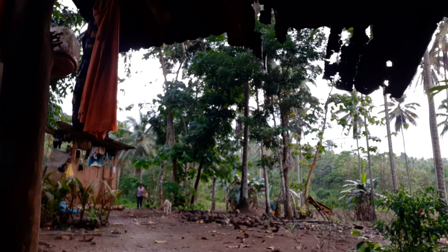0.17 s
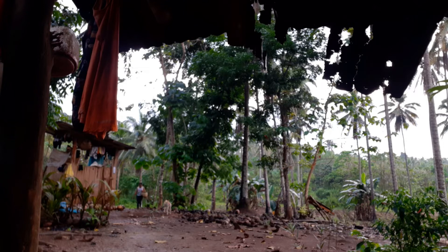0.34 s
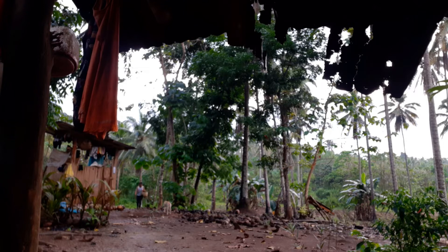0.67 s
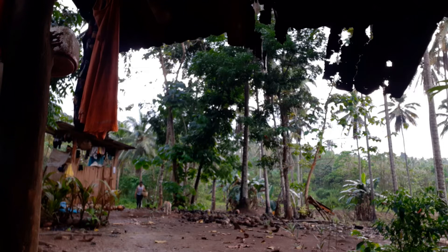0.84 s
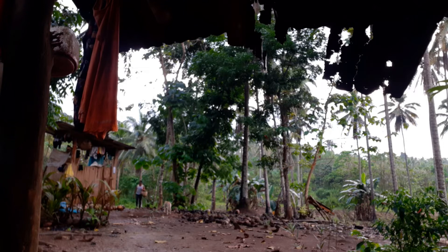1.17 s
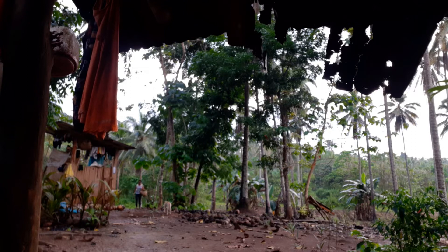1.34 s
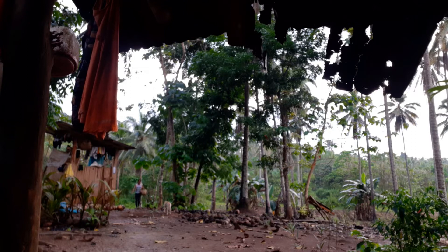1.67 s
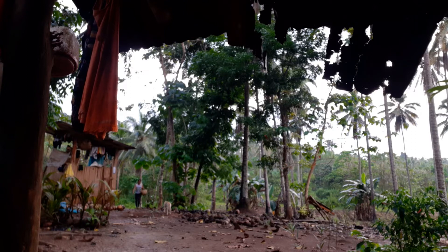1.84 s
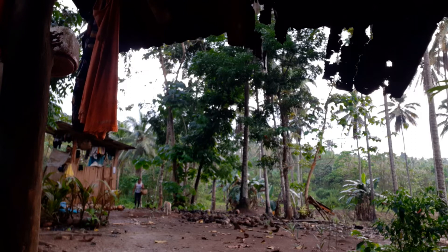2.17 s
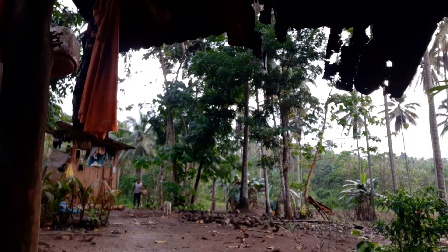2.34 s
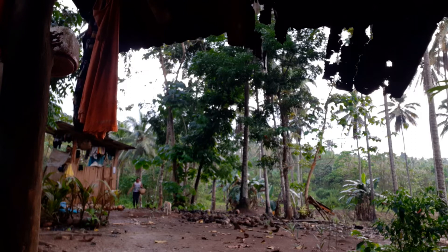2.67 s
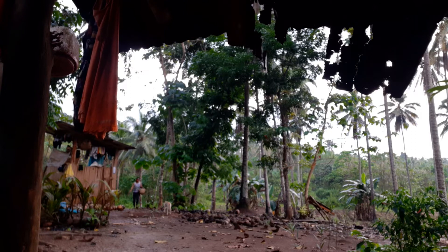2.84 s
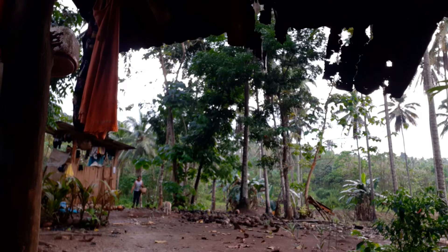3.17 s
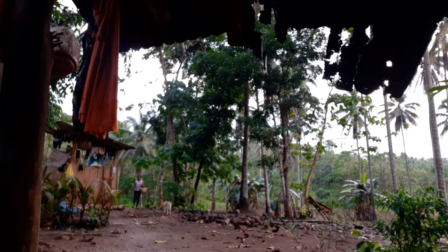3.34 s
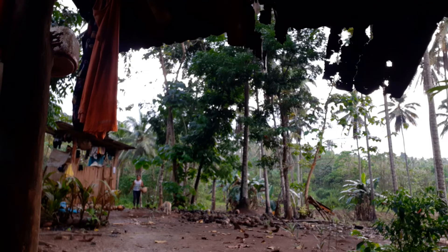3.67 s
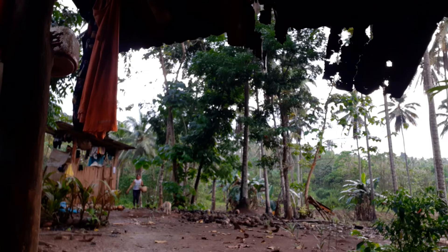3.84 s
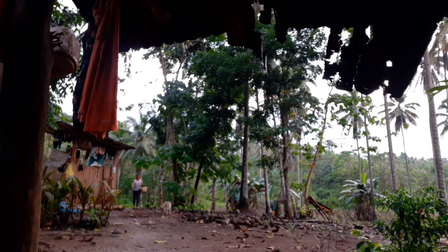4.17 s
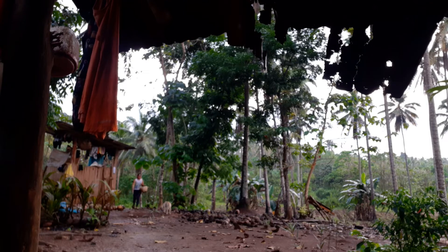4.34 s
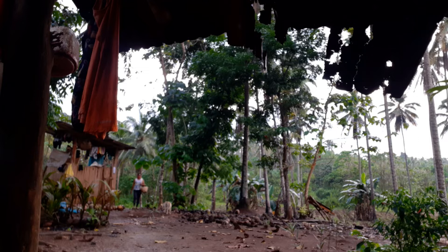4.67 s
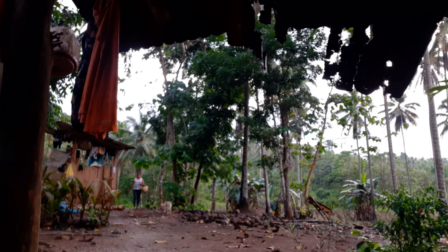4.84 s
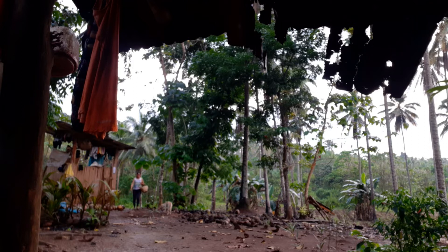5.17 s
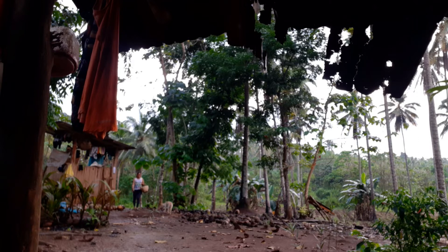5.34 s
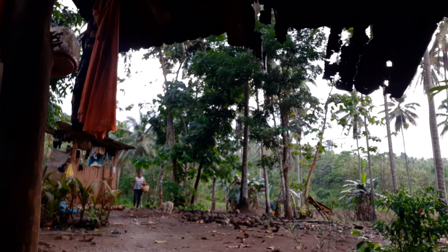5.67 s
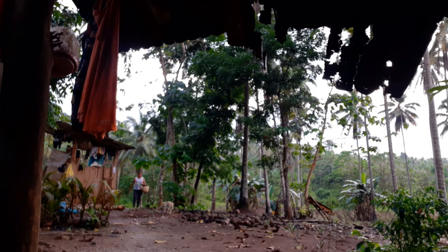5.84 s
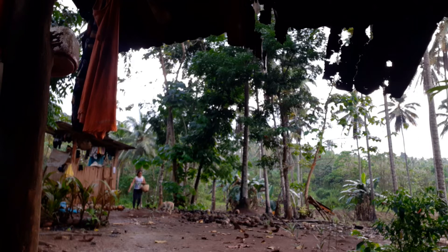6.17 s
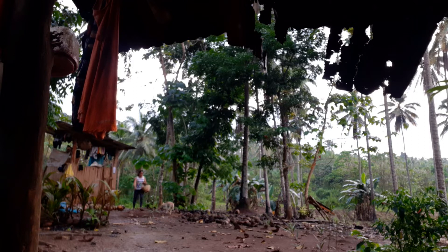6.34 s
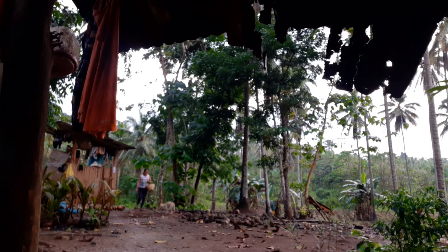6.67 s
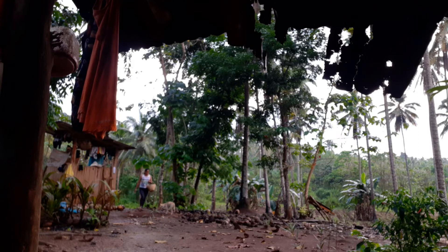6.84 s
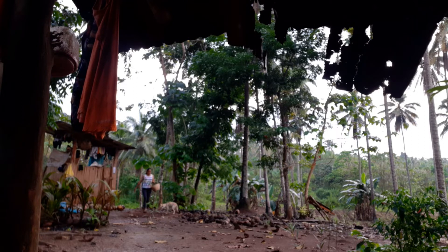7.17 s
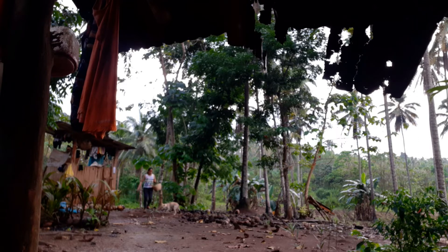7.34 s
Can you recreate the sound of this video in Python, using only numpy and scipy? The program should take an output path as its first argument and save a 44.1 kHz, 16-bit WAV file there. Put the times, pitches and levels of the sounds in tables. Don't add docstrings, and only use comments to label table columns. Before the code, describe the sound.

Outdoor yard with steady close hen clucks ending in a strained squawk, high songbirds, faint insect hiss, soft footsteps on leaves and low rumble.

```python
import sys
import numpy as np
from scipy import signal
from scipy.fft import rfft, irfft, next_fast_len
from scipy.io import wavfile

SR = 44100
rng = np.random.default_rng(int(sys.argv[2]) if len(sys.argv) > 2 else 0)


def undo_db(level):
    steps = np.asarray(level, float) / 20
    return 10 ** steps


def master(y):
    cut = np.clip(np.atleast_2d(y).T, -1, 1)
    pcm = np.round(cut * 32767)
    wavfile.write(sys.argv[1], SR, pcm.astype(np.int16))


N = 330750
SIZE = next_fast_len(N + SR)
HZ = np.arange(SIZE // 2 + 1) * SR / SIZE
T = np.arange(N) / SR


def at_hz(points, hz):
    table_hz, value = np.array(points).T
    return np.interp(np.log(hz + 1), np.log(table_hz), value)


def rms_one(x):
    return x / np.sqrt(np.mean(x ** 2) + 1e-20)


def wobble(shape, hz):
    *rows, length = np.atleast_1d(shape)
    settle = 1500
    white = rng.standard_normal((*rows, (length // 12000 + 1) * 12000 + settle))
    lowpass = signal.butter(2, hz, fs=SR, output="sos")
    return rms_one(signal.sosfilt(lowpass, white[..., :length + settle])[..., settle:])


def add(out, s, x):
    i = round(s * SR)
    a, b = max(i, 0), min(i + len(x), N)
    out[a:b] += x[a - i:b - i]


# f/Hz, likeness/1
MIC_LIKENESS = [(60, 0.93), (130, 0.97), (290, 0.87), (640, 0.56), (1400, -0.22), (3080, -0.084),
                (6760, -0.035), (14800, 0.025)]


def coloured(spectrum):
    mid, side = rfft(rng.standard_normal((2, SIZE))) * undo_db(at_hz(spectrum, HZ))
    alike = np.clip(at_hz(MIC_LIKENESS, HZ), -1, 1)
    mid = mid * np.sqrt(1 + alike)
    side = side * np.sqrt(1 - alike)
    return rms_one(irfft([mid + side, mid - side], SIZE)[:, :N])


# f/Hz, t60/s
TREES_T60 = [(200, 0.1), (600, 0.21), (1000, 0.54), (2000, 0.57), (5000, 0.94), (12000, 0.067)]


def placed(x, pan_db, lag_s, wet_db, echo_db, reach):
    t, tail = np.arange(SR) / SR, 0
    white = rng.standard_normal((2, SR))
    for hz, t60 in TREES_T60:
        band = signal.butter(1, [hz / 3.05, hz * 1.82], "band", fs=SR, output="sos")
        tail = tail + signal.sosfilt(band, white) * undo_db(-60 * t / max(t60 * reach, .05))
    tail = tail * np.clip(t / 0.004, 0, 1) / np.sqrt(np.sum(tail ** 2) / 2)
    direct = np.exp(-2j * np.pi * HZ * [[0], [lag_s]])
    echo = undo_db(echo_db) * np.exp(-2j * np.pi * HZ * [[.046], [.0465]])
    pan = undo_db(pan_db / 2 * np.array([[1], [-1]]))
    path = pan * (direct + echo + undo_db(wet_db) * rfft(tail, SIZE))
    return irfft(rfft(x, SIZE) * path, SIZE)[:, :N]


# f/Hz, level/dB per Hz
RUMBLE = [(12, -47), (20, -29.5), (65, 1.5), (97, 2.5), (372, -13.5), (530, -13), (1150, -16.5),
          (1390, -22.5), (1530, -12), (1850, -20), (2080, -13.5), (2400, -19), (3110, -14.5), (4220, -22.5),
          (5600, -23.5), (7280, -16), (12300, -120)]


def rumble():
    return undo_db(-52.5 + 2.44 * wobble(N, 2.8)) * coloured(RUMBLE)


# t/s, peak level/dB, spread/s
FAR_SWELLS = [
    (.67, -58, 0.22),
    (3.88, -48.5, 0.15),
    (6.27, -58.5, 0.22),
]


def far_yard():
    level = undo_db(-56 - 0.64 * T)
    for s, db, spread in FAR_SWELLS:
        level = level + undo_db(db) * np.exp(-((T - s) / spread) ** 2)
    colour = [(100, -73), (180, -2), (300, -9), (500, -12.5), (1200, -14.5), (3000, -47)]
    return level * undo_db(-5.5 + 3.8 * wobble(N, 9.1)) * coloured(colour)


# f/Hz, level/dB per Hz
INSECTS = [(2940, -22), (5000, -15), (6060, -32), (6590, -5.5), (7410, 0), (7650, -0.5), (8410, -22),
           (9490, -15.5), (10100, -4.5), (10300, -4), (10800, -8.5), (10900, -10.5), (12000, -29.5),
           (14000, -21), (15300, -22.5)]


def insects():
    return undo_db(-55 + 0.51 * wobble(N, 60)) * coloured(INSECTS)


# t/s, peak level/dB, t60/s
STEPS = [
    (0.2234, -48, 0.11),
    (0.746, -51, 0.68),
    (2.1905, -49.5, 0.19),
    (2.664, -46.5, 0.28),
    (3.704, -41.5, 0.34),
]
# f/Hz, level/dB per Hz
STEP_COLOUR = [(35, -40), (60, -8), (347, -5.5), (551, -16), (916, 3.5), (1450, -6), (1600, -5.5),
               (7500, -22.5), (8820, -37), (9900, -23), (15000, -34)]
# t/s, peak level/dB
RUSTLES = [(.049, -52), (.258, -48), (.379, -53), (1.317, -64), (2.678, -65), (3.159, -53.5), (3.722, -60),
           (3.866, -49), (3.966, -49), (4.179, -55), (5.402, -47), (7.129, -63)]


def footfalls():
    crunch, rustle = np.zeros(N), np.zeros(N)
    t = np.arange(SR // 2) / SR
    for s, db, t60 in STEPS:
        add(crunch, s, undo_db(db + 7.5 - 60 * t / max(t60, .05)) * np.clip(t / 0.0074, 0, 1))
    for s, db in RUSTLES:
        add(rustle, s - .01, undo_db(db - 7.5) * np.hanning(round(.08 * SR)))
    leaves = coloured([(2000, -30), (5000, 7), (9000, -1), (13000, 5), (15500, -3)])
    return crunch * coloured(STEP_COLOUR) + rustle * leaves


# start t/s, end t/s, f/Hz, level/dB
CRICKET = [
    (4.995, 5.89, 3090, -61),
    (1.22, 1.45, 2900, -65),
]


def cricket():
    out = np.zeros(N)
    chirps_per_s = 8.75
    for start, end, hz, db in CRICKET:
        t = np.arange(start, end, 1 / SR)
        swing = np.sin(2 * np.pi * chirps_per_s * (t - start) + 0.48 * wobble(len(t), 3))
        throb = np.clip(swing, 0, 1) * (1 + .5 * wobble(len(t), 79))
        add(out, start, undo_db(db + 0.5) * throb * np.sin(2 * np.pi * hz * t))
    return out


def whistle(hz, db, fuller_db):
    tone = np.sin(2 * np.pi * np.cumsum(hz * (1 + 0.0098 * wobble(len(hz), 59))) / SR)
    level_db = db + 2.5 * wobble(len(hz), 29) + fuller_db * np.log2(hz.max() / hz)
    return np.sqrt(2) * undo_db(level_db) * signal.windows.tukey(len(hz), .2) * tone


# start t/s, hold/s, dive/s, bottom f/Hz, level/dB
HIGH_SONG = [(.29, .11, .06, 3300, -61), (.81, .13, .11, 2750, -58), (1.8, .115, .08, 3400, -63),
             (2.29, .14, .05, 3700, -61), (2.82, .125, .09, 2900, -59), (3.61, .06, .02, 4400, -60),
             (6.425, .13, .065, 2900, -60), (6.79, .125, .055, 2750, -60), (7.345, .14, .06, 3500, -62)]


def high_songbird():
    out = np.zeros(N)
    top_hz, bend_hz = 4566, 231
    for s, hold, dive, low_hz, db in HIGH_SONG:
        t = np.arange(0, hold + dive, 1 / SR)
        held = top_hz - bend_hz * (np.minimum(t / hold, 1) * 1.4 - .3) ** 2
        dived = 1 - np.exp(-3.0 * np.clip((t - hold) / dive, 0, 1) ** 1.3)
        hz = held + (low_hz - held) * dived
        thin_db = 7 * np.exp(-((hz - 3900) / 450) ** 2)
        add(out, s, whistle(hz, db - 0.5 - thin_db, fuller_db=4.0))
    return out


# start t/s, length/s, top f/Hz, bottom f/Hz, level/dB
HOOKS = [(4.35, 0.076, 3870, 3550, -57), (4.466, 0.065, 3990, 2750, -54.5), (5.318, 0.076, 3880, 3065, -56),
         (5.42, 0.067, 3940, 3490, -54), (5.532, 0.067, 4093, 3170, -51), (5.664, 0.054, 4070, 3090, -49.5),
         (6.687, 0.062, 3830, 3200, -60)]


def hooked_notes():
    out = np.zeros(N)
    for s, length, top_hz, low_hz, db in HOOKS:
        u = np.linspace(0, 1, round(length * SR))
        hz = np.interp(u, [0, .2, .55, .72], [top_hz - 400, top_hz, .99 * top_hz, low_hz])
        add(out, s, whistle(hz, db, fuller_db=-3.0))
    return out


# start t/s, length/s, from f/Hz, to f/Hz, level/dB
SLIDES = [(0.089, 0.091, 3360, 3290, -53.5), (0.664, 0.0394, 3210, 2890, -48),
          (0.702, 0.028, 2910, 3350, -51.5), (0.887, 0.04, 3430, 3390, -58),
          (1.131, 0.046, 3254, 3330, -51.5), (3.845, .05, 3660, 3420, -64), (4.001, 0.036, 3200, 3410, -61),
          (4.543, .03, 4090, 3670, -52), (4.577, .04, 3670, 3570, -52), (6.45, 0.055, 3590, 3200, -64),
          (6.61, 0.0265, 3030, 3750, -63), (6.965, 0.047, 3380, 3270, -63), (7.099, .05, 3680, 3080, -66),
          (7.278, 0.068, 3850, 3200, -63), (7.418, 0.036, 3700, 3380, -67)]


def slides():
    out = np.zeros(N)
    for s, length, from_hz, to_hz, db in SLIDES:
        add(out, s, whistle(np.linspace(from_hz, to_hz, round(length * SR)), db, fuller_db=4.0))
    return out


# start t/s, end t/s, top f/Hz, bottom f/Hz, level/dB
TRILLS = [
    (0.409, 0.916, 3750, 2566, -52.5),
    (3.195, 3.753, 3927, 2697, -48.5),
    (4.606, 4.956, 3900, 2732, -48.5),
]


def trills():
    out = np.zeros(N)
    notes_per_s, pause = 30.2, .62
    for start, end, top_hz, low_hz, db in TRILLS:
        t = np.arange(0, end - start, 1 / SR)
        u = (t * notes_per_s + .03 * wobble(len(t), 12.6)) % 1
        fallen = np.interp(u, [.25, .42, .58, .72], [0, pause, pause, 1])
        hz = top_hz + (low_hz - top_hz) * fallen + 50 * wobble(len(t), 64.4)
        phase = 2 * np.pi * np.cumsum(hz) / SR
        level = np.sin(np.pi * np.clip(u / .95, 0, 1)) ** 0.37 * undo_db(db + 1.7 * wobble(len(t), 60))
        tone = np.sin(phase) + undo_db(-8.5) * fallen * np.sin(2 * phase)
        add(out, start, level * signal.windows.tukey(len(t), .07) * tone)
    return out


def syrinx(pitch_hz, half, rough, throat_db, count, waver_db):
    n = len(pitch_hz)
    phase = np.pi * np.cumsum(pitch_hz * (1 + 0.033 * rough * wobble(n, 104))) / SR
    k = np.arange(1, count + 1)[:, None]
    hz = k * pitch_hz / 2
    gain = undo_db(throat_db(hz) + waver_db * wobble((count, n), 37.5))
    gain = gain * np.where(k % 2, half, 1) * (hz < 15300)
    breath = np.clip(rough * hz / 1000, 0, 1)
    flutter = np.sqrt(1 - breath ** 2) + breath * wobble((count, n), 210)
    start_phase = rng.uniform(0, 2 * np.pi, k.shape)
    tone = np.sum(gain * flutter * np.cos(k * phase + start_phase), axis=0)
    return tone / np.sqrt(np.sum(gain ** 2, axis=0) / 2 + 1e-20)


def clucks(rows, throat, half, rough):
    out = np.zeros(N)
    for s, db, hz, length in rows:
        loose = 1 + 0.04 * (-40 - db)
        u = np.linspace(-1, 1, round(1.67 * length * SR))
        pitch = hz * (1.01 - 0.0413 * u ** 2 + 0.0088 * u)
        voice = syrinx(pitch, half * loose * (1 - 0.49 * u), rough * loose * (1 - 0.72 * u),
                       lambda f: at_hz(throat, f), count=26, waver_db=4.0)
        add(out, s - .8 * length, undo_db(db + 1.5 * u) * np.cos(u * np.pi / 2) ** 1.82 * voice)
    return out


# middle t/s, level/dB, f/Hz, length/s
LOW_CLUCKS = [
    (5.125, -42, 581, 0.032),
    (5.333, -38.5, 408.5, 0.046),
    (5.655, -41.5, 364, .06),
]
# f/Hz, level/dB
LOW_THROAT = [(120, -34), (200, -4.5), (390, -5), (620, 7.5), (850, -3.5), (1180, -28), (1500, -13),
              (2100, -14.5), (2800, -24), (4000, -15), (6000, -45)]


def other_hen():
    return clucks(LOW_CLUCKS, LOW_THROAT, half=0.97, rough=0.77)


# middle t/s, level/dB, f/Hz, length/s
CLUCKS = [(.02, -35, 506.4, 0.042), (.232, -38, 486, 0.05), (.44, -38, 483.3, 0.036), (.66, -35, 481, 0.03),
          (.878, -36, 487, 0.05), (1.098, -38, 486.7, 0.044), (1.32, -37, 483, 0.034),
          (1.535, -36, 484.5, 0.044), (1.75, -37, 486.4, .043), (1.972, -37, 485, 0.041),
          (2.21, -44.5, 485.4, 0.066), (2.44, -36.5, 484.8, 0.048), (2.645, -37, 494, 0.041),
          (2.865, -35, 492, 0.048), (3.095, -36.5, 486.4, 0.047), (3.345, -38.5, 471, 0.04),
          (3.722, -41.5, 470, 0.052), (3.97, -39.5, 471.5, .039), (4.148, -45, 441, 0.024),
          (4.185, -38, 485, 0.038), (4.41, -39, 472.6, 0.032), (4.63, -41, 474, 0.045),
          (4.855, -40, 474, 0.038), (5.125, -36.5, 476.5, .043), (5.582, -44.5, 445.6, 0.038),
          (5.805, -40, 471, 0.046)]
# f/Hz, level/dB
CLUCK_THROAT = [(150, -29), (250, -16.5), (485, -8), (730, -11.5), (980, 3), (1200, 1), (1480, -8),
                (1750, -16), (2000, -14), (2500, -27), (3000, -17), (3600, -19), (4500, -37), (6500, -29)]


def hen_clucks():
    return clucks(CLUCKS, CLUCK_THROAT, half=0.45, rough=0.5)


# t/s, f/Hz, level/dB
SQUAWKS = [
    [(5.866, 522, -47), (5.875, 513.3, -31), (5.9, 567, -29.5), (5.96, 527, -28), (6.01, 527.2, -29),
     (6.125, 543, -29.5), (6.145, 580, -23.5), (6.166, 621, -25.5), (6.18, 610, -46)],
    [(6.312, 564.6, -41), (6.338, 587.6, -27.5), (6.352, 577, -28), (6.372, 569, -46), (6.388, 565, -73)],
]
# f/Hz, level/dB
SQUAWK_THROAT = [(300, -35), (530, -11.5), (1100, 4), (1620, 1.5), (1800, -21), (2210, 1.5), (2350, -5),
                 (2700, -18), (3500, -20), (4300, -18), (5200, -16), (5850, -18), (6500, -23.5),
                 (8000, -23), (9000, -28), (10500, -32.5), (15000, -36)]
BREAK_DULLS_DB = [10.5, 17.5]


def squawks():
    out = np.zeros(N)
    for call, dull_db in zip(SQUAWKS, BREAK_DULLS_DB):
        s, *columns = np.transpose(call)
        t = np.arange(s[0], s[-1], 1 / SR)
        hz, db = [np.interp(t, s, c) for c in columns]
        rough = .06 + .0016 * np.abs(hz - 526) + .14 * np.exp((s[0] - t) / .02)
        throb = np.clip((hz - 561.5) / 22.3, .1, .9)
        beak_open = (1 + np.tanh((t - 5.98) / .03)) / 2
        mouth_hz = 3290 + (3750 - 3290) * beak_open

        def throat_db(f):
            mouth = (10 + 40 * rough) * np.exp(-((f - mouth_hz) / 330) ** 2)
            dulled = dull_db * throb ** 2 * np.abs(np.log2(f / 1150))
            return at_hz(SQUAWK_THROAT, f) + mouth - dulled

        beat = 1 - throb + 1.03 * throb * np.cos(2 * np.pi * 55 * t)
        half = np.clip(1.9 * (rough - .08) * (1 - throb), .01, 1)
        voice = syrinx(hz, half, rough * (1 - 0.1 * throb), throat_db, count=56, waver_db=2.5)
        add(out, s[0], undo_db(db + 2.36) * beat * voice)
    return out


# f/Hz, left minus right level/dB
HEN_PAN = [(250, -7), (500, -1.5), (1000, -5.5), (2000, -2.5), (6000, -1)]


def scene():
    yard = (rumble() + far_yard()) * undo_db([[-1.2], [1.2]]) + insects() * undo_db([[-.4], [.4]])
    steps = footfalls() * undo_db([[-1.1], [1.1]])
    songs = high_songbird() + hooked_notes() + slides() + cricket()
    birds = placed(songs, pan_db=-3.5, lag_s=0.00027, wet_db=-4.5, echo_db=-36, reach=0.31)
    thicket = placed(trills(), pan_db=-2.0, lag_s=0.00021, wet_db=0.0, echo_db=-11, reach=0.46)
    other = placed(other_hen(), pan_db=-4.0, lag_s=.0001, wet_db=-7.5, echo_db=-22, reach=0.37)
    hen_pan = at_hz(HEN_PAN, HZ)
    hen = placed(hen_clucks(), hen_pan, lag_s=0.000254, wet_db=-9.5, echo_db=-16, reach=0.66)
    squawk = placed(squawks(), hen_pan, lag_s=0.0002805, wet_db=-8.5, echo_db=-13.5, reach=0.6)
    return yard + steps + birds + thicket + other + hen + squawk


def roll_off(x):
    return signal.sosfilt(signal.butter(12, 15450, fs=SR, output="sos"), x)


def record(dry):
    steep_cut = signal.ellip(10, .5, 70, 15430, fs=SR, output="sos")
    mix = signal.sosfilt(steep_cut, dry)
    return roll_off(mix)


dry = scene()
out = record(dry)
master(out)
```